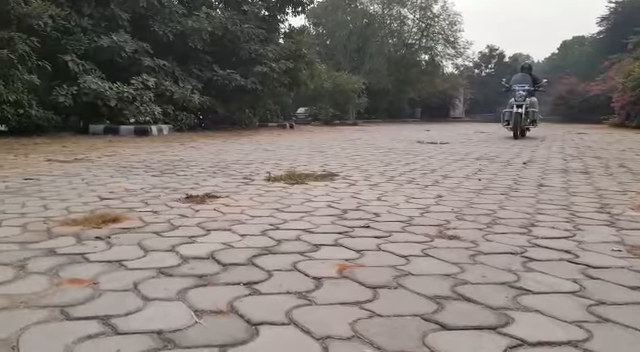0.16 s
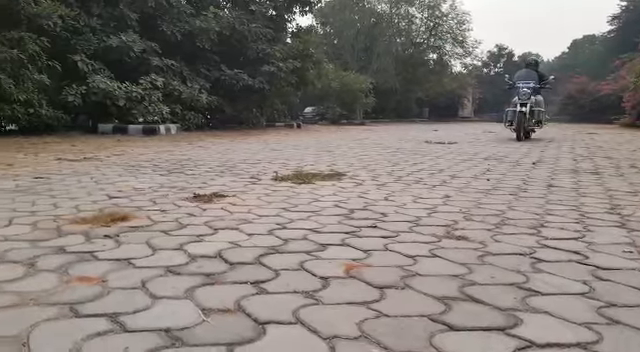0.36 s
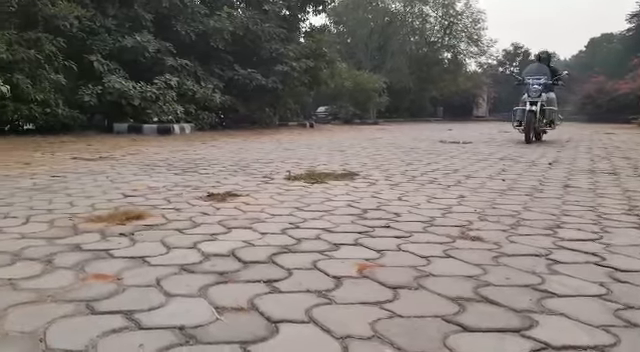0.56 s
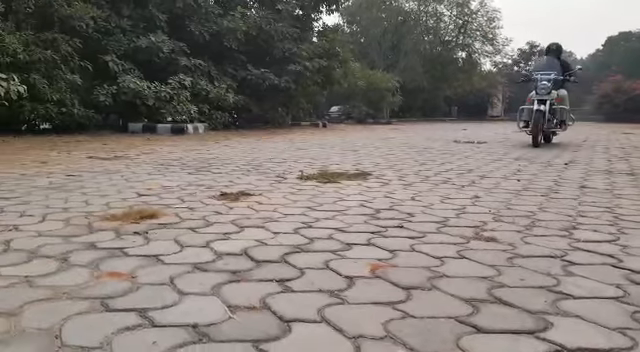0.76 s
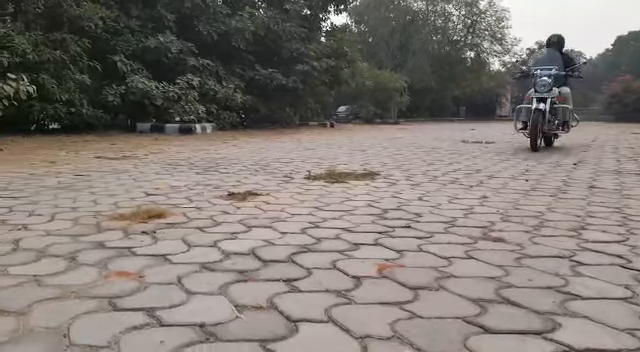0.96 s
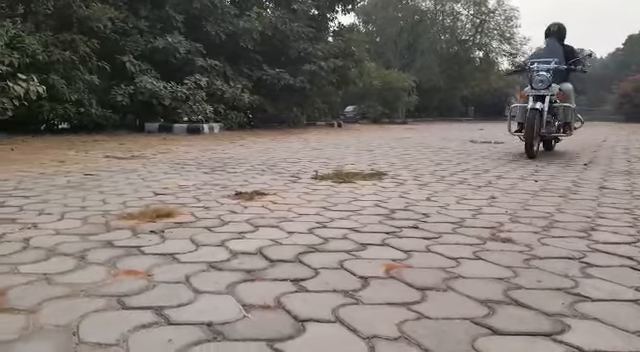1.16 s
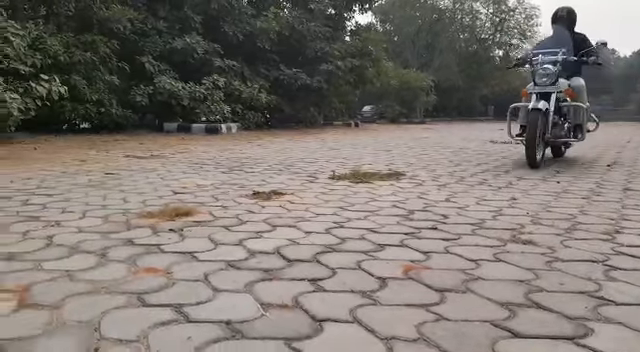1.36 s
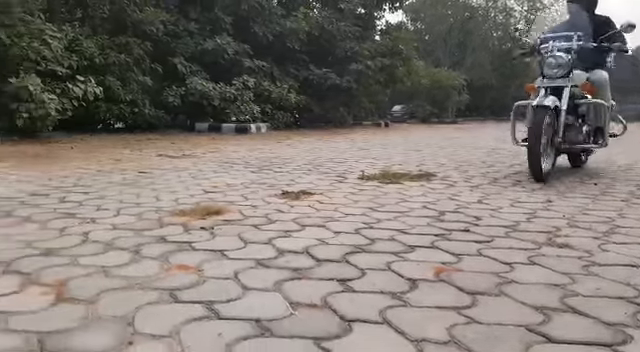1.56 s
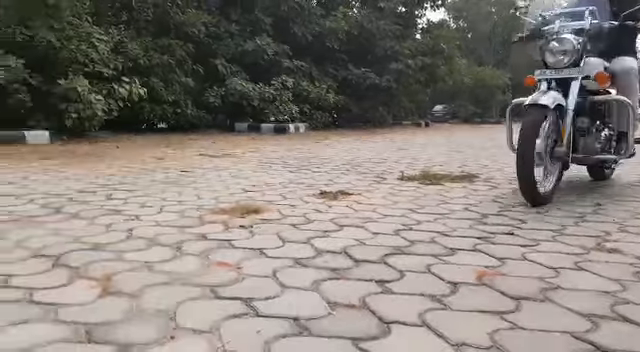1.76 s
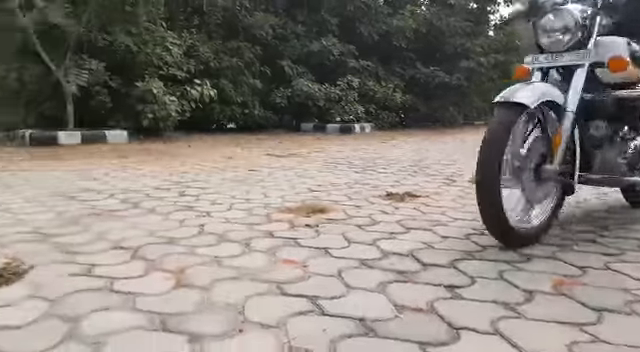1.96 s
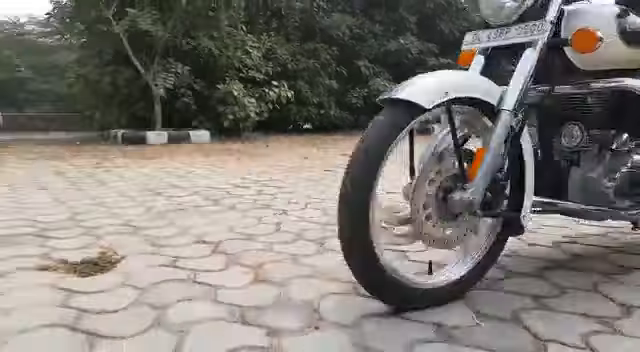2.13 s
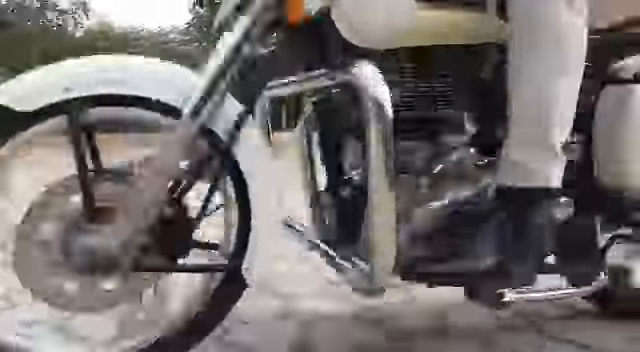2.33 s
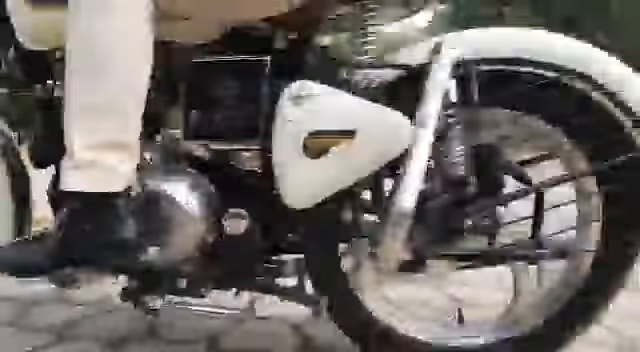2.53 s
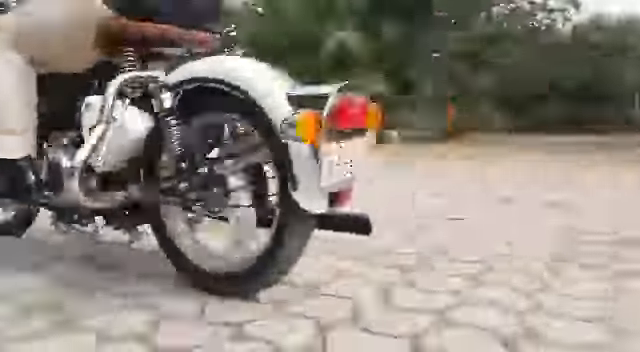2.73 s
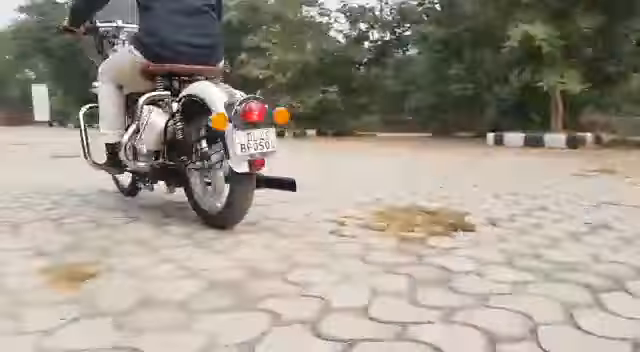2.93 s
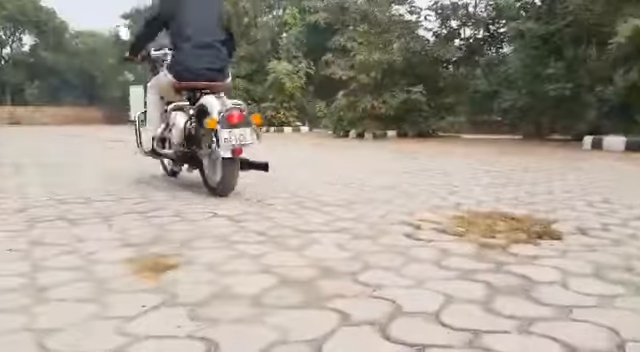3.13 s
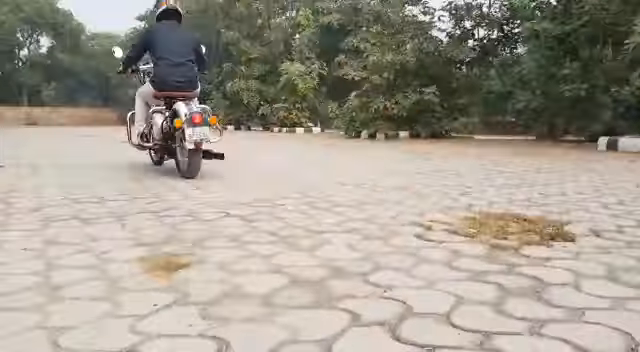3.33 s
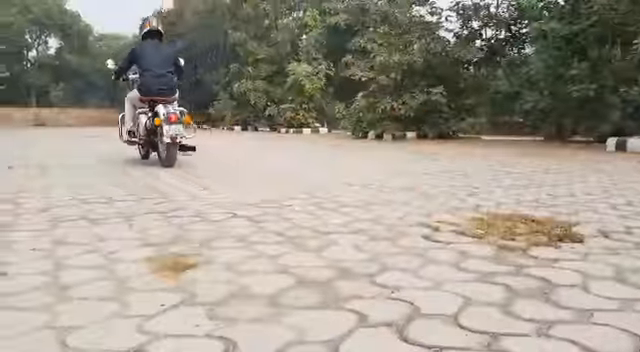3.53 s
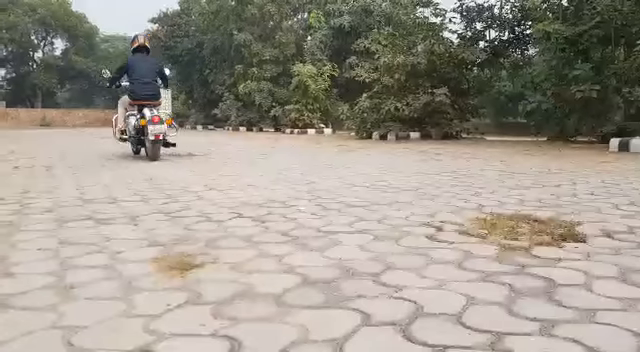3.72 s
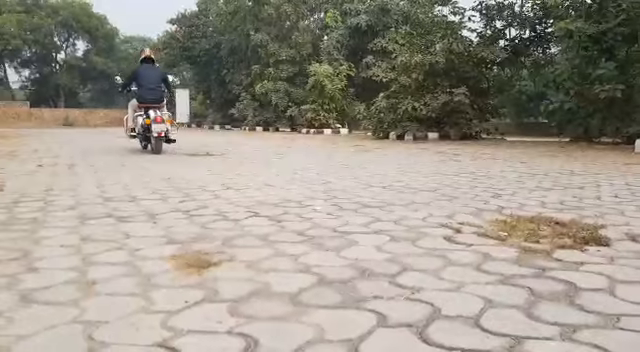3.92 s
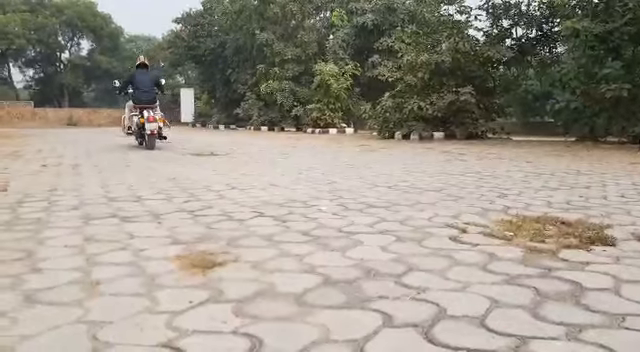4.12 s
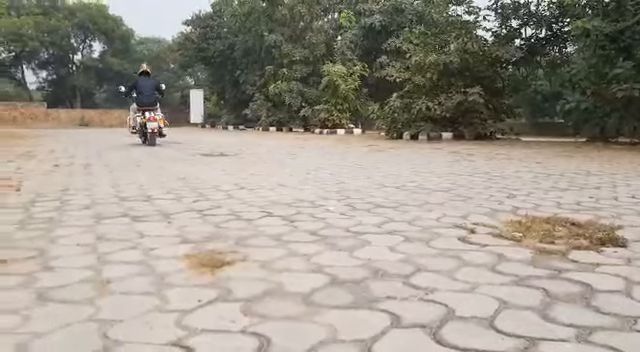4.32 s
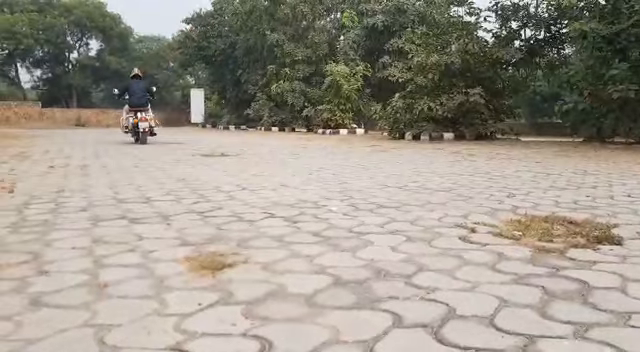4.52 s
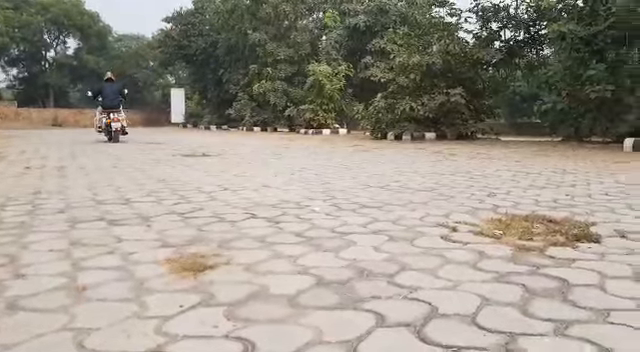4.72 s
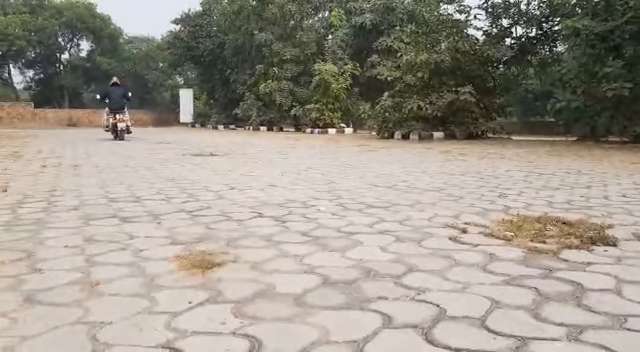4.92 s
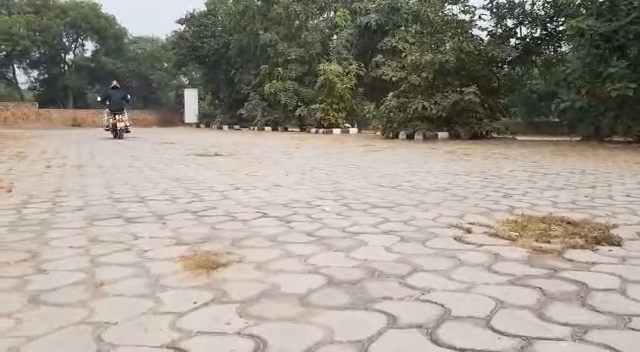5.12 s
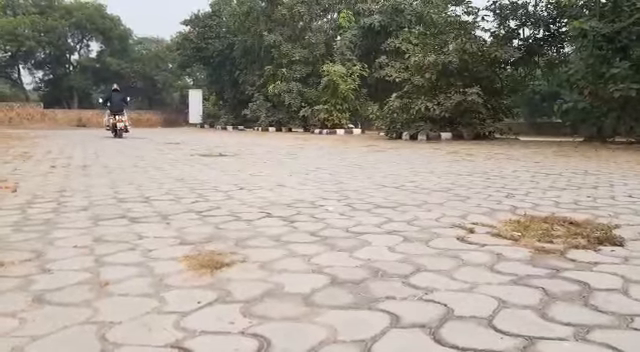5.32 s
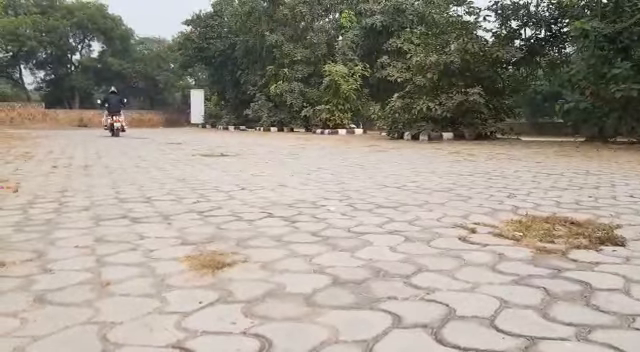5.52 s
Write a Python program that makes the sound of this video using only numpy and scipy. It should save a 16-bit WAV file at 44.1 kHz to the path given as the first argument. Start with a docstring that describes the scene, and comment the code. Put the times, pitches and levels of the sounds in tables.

```python
"""A single-cylinder motorcycle with an open pipe rolls past a pair of microphone ports on a paved lot among trees.
Every firing knocks a few low pipe modes, and gas puffs rasp at the pipe's mouth once it is heard from behind.
Valves, chain and tyres are banded noise that ticks with the engine cycle; a casing sings near 1 kHz on the approach.
The trees return the beat as a decaying noise echo. Faint bands and gritty hisses come and go over outdoor air,
and a low resonant rumble swells at the end."""
import sys
import numpy as np
from scipy import signal
from scipy.io import wavfile
from scipy.ndimage import uniform_filter1d, map_coordinates

SR = 44100
rng = np.random.default_rng(int(sys.argv[2]) if len(sys.argv) > 2 else 0)


def pcm_store(signal):
    """Save signal as 16-bit PCM."""
    levels = np.round(np.clip(np.atleast_2d(signal), -1, 1) * 32767)
    wavfile.write(sys.argv[1], SR, levels.astype(np.int16).T)


N = 250488
T = np.arange(N) / SR

# the ride past: time_s [s], beat_db [dB, before each pipe mode's own level], echo_db [dB relative to the beat]
RIDE = [(0, -11, -16), (.2, -10.5, -12), (.55, -9, -10.5), (1.2, -6.5, -13.5), (1.7, -3, -13.5),
        (2.1, -0.8, -12.5), (2.6, -1.4, -12), (2.85, -2.5, -32), (3.1, -5.5, -28), (3.8, -12, -45),
        (4.1, -11.9, -22), (4.8, -10, -16), (5, -8, -15), (5.12, -10.5, -9.5), (5.68, -12.5, -11)]


def exhaust(spread_db=0.71):
    """Each firing rings damped pipe modes, softened by the opening valve; the two lowest boom at close range."""
    # pipe modes: pitch_hz [Hz], t60_s [s], polarity [+1/-1], front_db and rear_db [dB over the beat level]
    pipe_modes = [(71, .28, 1, -8, -7.4), (135, 1.0, -1, 1.4, -.7), (216, .043, -1, 18.6, 20),
                  (299, .17, -1, 4.4, 3.5), (347, .043, 1, 17.3, 19.8), (390, .04, 1, 17.4, 17.5)]
    rise_s, valve_hz = .0034, 114   # from valve opening to the dip; softness of the blow
    outflow_s, shut_t60_s = .0174, .078   # the gas stream feeds the ring this long, then it dies fast
    jitter_s, beat_spread_db, pitch_spread = .0002, .5, .01   # chance from firing to firing
    boom_front_db, boom_rear_db, boom_near_db, pipe_pass_s = 1.5, 0.3, 4.5, 2.63

    count = turns()
    fire_s = np.interp(np.arange(count[-1] // 1 + 1), count, T)
    fire_s = np.r_[2 * fire_s[0] - fire_s[1], fire_s]   # the beat already ringing at the start
    mode_chance = rng.standard_normal((len(fire_s), len(pipe_modes)))
    pitch_chance, level_chance, time_chance = rng.standard_normal((3, len(fire_s)))
    fire_s = fire_s + jitter_s * time_chance
    level_db = in_time(RIDE, fire_s)[0] + beat_spread_db * level_chance
    rear = np.interp(fire_s, T, facing())
    near = np.interp(fire_s, T, nearness(pipe_pass_s))
    boom_db = boom_front_db + rear * (boom_rear_db - boom_front_db) + boom_near_db * near ** 2

    u = np.arange(SR // 5) / SR
    out = np.zeros(N + 2 * SR)   # a second of room at each end
    shut_db = -60 * np.maximum(u - outflow_s, 0) / shut_t60_s
    for i in range(len(fire_s)):
        start = SR + round((fire_s[i] - rise_s) * SR)
        heat = 1 + pitch_spread * pitch_chance[i]   # the gas is a little hotter or cooler at each firing
        for k, (hz, t60, polarity, front_db, rear_db) in enumerate(pipe_modes):
            mode_db = level_db[i] + front_db + rear[i] * (rear_db - front_db)
            mode_db += (k < 2) * boom_db[i] + spread_db * mode_chance[i, k]
            envelope = amp(mode_db - 60 * u / t60 + shut_db)
            out[start:start + len(u)] += polarity * envelope * np.sin(2 * np.pi * hz * heat * u)
    r = np.exp(-2 * np.pi * valve_hz / SR)
    return signal.lfilter([(1 - r) ** 3], np.poly([r, r, r]), out)[SR:SR + N]   # three one-pole low-passes


def puffs():
    """Raspy noise bursts in step with the beat, once the pipe's mouth points this way."""
    # gas puffs: at [share of cycle], decay [share of cycle], level_db [dB relative to the beat level]
    puff_times = [(0.229, 0.25, -33), (.945, 0.024, -28)]
    puff_hz, width_hz = 915, 300
    turn = cycle()
    gate = sum(amp(db) * np.exp(-((turn - at) % 1) / decay) for at, decay, db in puff_times)
    rasp = resonance(resonance(rng.standard_normal(N), puff_hz, width_hz), puff_hz, 2 * width_hz)
    return amp(in_time(RIDE)[0]) * facing() * gate * rms_one(rasp)


def running_gear(flicker_db=0.87, miss_db=0.4, scatter_hz=900):
    """Banded noise, ticking with valve contacts and loose parts; returns the direct and the scattered stereo part."""
    # noise colour from the front: band_hz [Hz], level_db [dB per Hz]
    front_colour = [(250, -30), (430, 3), (833, -7.5), (998, -2), (1210, -20.5), (1430, -8.5), (1770, -15),
                    (4360, -22.5), (5630, -22), (15600, -24.5)]
    # noise colour from behind: band_hz [Hz], level_db [dB per Hz]
    rear_colour = [(250, -33), (430, -4), (599, 1.5), (675, -9.5), (954, -2.5), (1410, -20), (3810, -29),
                   (7380, -28), (15600, -18)]
    # colour added broadside: band_hz [Hz], lift_db [dB]
    side_lift = [(430, -6), (520, -4), (700, 6.5), (1000, 2), (2500, 1), (4500, 0), (9000, -8),
                 (15600, -5.5)]
    # valve train contacts: at [share of cycle], decay [share of cycle], lift_db [dB, before view and range scale it]
    contacts = [(0.197, 0.13, 3.5), (0.482, 0.014, -2), (.72, 0.051, -1), (0.952, 0.11, 1.5)]
    # resonances of fins and covers: pitch_hz [Hz], width_hz [Hz], front_db and rear_db [dB over the gear noise]
    fins = [(533.5, 27, 1, -5), (596, 33, -55, 2), (894, 21, 0, -15), (1415, 66, 0.5, -15),
            (1509, 22, 4.5, -40), (1620, 17, -3, -3), (2034, 17, 8, -51), (2440, 38, 3.5, -13),
            (3120, 21, -10, 9), (4270, 640, -8, -5), (7510, 690, -3, 7)]
    growl_front_db, growl_rear_db, growl_near_db, growl_pass_s = -32, -36, 3.5, 2.42   # relative to the beat level
    rattle_per_s, rattle_s, rattle_db = 130, 0.0019, 2   # knocks a second, decay, strength over the hiss
    scatter_db = 1   # diffuse share of the gear noise

    rear, near, turn = facing(), nearness(PASS_S), cycle()
    growl_db = in_time(RIDE)[0] + growl_front_db + rear * (growl_rear_db - growl_front_db)
    growl_db = growl_db + growl_near_db * nearness(growl_pass_s) ** 4.5
    hiss_db = passing_db(PASS_S, near_db=-33.5, rear_db=-6, far_db=-55.5)
    sizzle_db = passing_db(2.4, near_db=-39, rear_db=-3, far_db=-64)

    ticks_db = sum((db + miss_db * drift(8.6)) * np.exp(-((turn - at) % 1) / decay) for at, decay, db in contacts)
    ticks_db = ticks_db * (1 - 0.2 * rear + 0.42 * near)   # sharp close by, blurred from behind
    knocks = (rng.random(N) < rattle_per_s / SR) * rng.uniform(0.17, 1.36, N)
    knocks = knocks * amp(.5 * (hiss_db - hiss_db.max()))   # heard mostly at close range
    rattle = 1 + amp(rattle_db) * signal.lfilter([1], [1, -np.exp(-1 / (rattle_s * SR))], knocks)

    # two noise sets for alternate bands, each with a direct, a left and a right channel
    white = rng.standard_normal((2, 3, N)) * rattle * amp(ticks_db)
    edges_hz = 400 * 2 ** np.arange(0, 5.6, .4)
    parts = [0, 0, 0]   # growl under 1.6 kHz, hiss to 6.5 kHz, sizzle above
    for k, (low, high) in enumerate(zip(edges_hz, edges_hz[1:])):
        hz = np.sqrt(low * high)
        colour_db = (1 - rear) * at_hz(front_colour, hz) + rear * at_hz(rear_colour, hz)
        colour_db = colour_db + near * at_hz(side_lift, hz)
        parts[int(hz > 1600) + int(hz > 6500)] += band(white[k % 2], low, high) * amp(colour_db + flicker_db * drift(37.0))

    gear = 0
    for level_db, part in zip((growl_db, hiss_db, sizzle_db), parts):
        power = uniform_filter1d(np.mean(part ** 2, axis=0), size=SR // 4)
        gear = gear + amp(level_db) * part / np.sqrt(power)
    ringing = 0
    for hz, width_hz, front_db, rear_db in fins:
        ringing = ringing + amp(front_db + rear * (rear_db - front_db)) * resonance(gear, hz, width_hz)
    gear = gear + ringing
    scattered = high_pass(gear[1:], scatter_hz, order=1)
    return gear[0], amp(scatter_db) * scattered


def whine(idle=0.33):
    """A narrow casing resonance on noise, shaken by a valve contact once a cycle."""
    # singing casing: time_s [s], level_db [dB]
    whine_level = [(0, -42.5), (.8, -40), (1.2, -36), (1.93, -35), (2.2, -63), (2.3, -28.5), (2.55, -43),
                   (3.05, -62), (5.68, -56)]
    whine_hz, width_hz = 985.5, 22.6
    shake_at, shake_fade = 0.15, 0.23   # shares of the cycle
    shake = idle + np.exp(-((cycle() - shake_at) % 1) / shake_fade)
    tone = resonance(resonance(shake * rng.standard_normal(N), whine_hz, width_hz), whine_hz, 7.5 * width_hz)
    return amp(in_time(whine_level)[0]) * tone / np.sqrt(uniform_filter1d(tone ** 2, size=SR // 5) + 1e-12)


def trees(x):
    """Scattered returns from foliage and kerbs: decaying noise as the echo, nearly alike at both ports."""
    t60_s, gap_s, low_cut_hz = 0.65, 0.0233, 182
    u = np.arange(SR // 2) / SR
    noise = rng.standard_normal((2, len(u))) * amp(-60 * u / t60_s) * (u > gap_s)
    tail = np.array([noise[0] + 0.32 * noise[1], noise[0] - 0.32 * noise[1]])
    tail = tail / np.sqrt(np.sum(noise[0] ** 2))
    return signal.fftconvolve(high_pass(x, low_cut_hz)[None], tail, axes=1)[:, :N]


def tones():
    """Faint narrow bands: noise twice through a resonance, swelling and fading."""
    # faint bands: start_s [s], length_s [s], pitch_hz [Hz], width_hz [Hz], level_db [dB]
    faint_bands = [(0, 0.83, 1525, 50, -47), (0.043, .5, 1660, 25, -52), (1.5, .8, 4130, 710, -47.5),
                   (3.751, 0.76, 3120, 120, -62)]
    out = np.zeros(N)
    for start_s, length_s, hz, width_hz, db in faint_bands:
        start, n = round(start_s * SR), round(length_s * SR)
        tone = resonance(resonance(rng.standard_normal(SR), hz, width_hz), hz, 2 * width_hz)
        out[start:start + n] += amp(db) * rms_one(tone)[-n:] * signal.windows.tukey(n, .5)
    return out


def scuffs(broad_db=-4):
    """Brief gritty hisses: a broad noise hump over wide-band noise."""
    # gritty hisses: start_s [s], length_s [s], hump_db [dB], centre_hz [Hz]
    hisses = [(3.356, 0.045, -50, 4100), (3.525, 0.061, -41, 4300), (3.553, .006, -32.5, 3000),
              (4.433, 0.12, -50, 3600), (4.532, 0.015, -52.5, 9000), (5.587, 0.0097, -52.5, 9000),
              (5.647, 0.014, -51, 11000)]
    out = np.zeros((2, N))
    for start_s, length_s, db, hz in hisses:
        start, n = round(start_s * SR), round(length_s * SR)
        white = rng.standard_normal((2, SR // 8))
        hump = rms_one(band(white, hz * 0.57, hz * 1.35))
        grit = hump + amp(broad_db) * rms_one(band(white, 1500, 17500))
        out[:, start:start + n] += amp(db) * grit[:, -n:] * signal.windows.tukey(n, .6)
    return out


def rumble():
    """A wavering low hum: noise through two sharp resonances, with swells over a resting level."""
    # swells of a far low rumble: centre_s [s], half_width_s [s], level_db [dB]
    swells = [(4.9, 0.055, -41), (5.3, 0.13, -31.5), (5.58, .2, -35)]
    rumble_hz, rest_db = 47.5, -45
    hum = resonance(resonance(rng.standard_normal(N), rumble_hz, 2.4), rumble_hz, 5.0)
    level = amp(rest_db) + sum(amp(db) * np.exp(-((T - s) / width_s) ** 2) for s, width_s, db in swells)
    return level * hum / np.sqrt(uniform_filter1d(hum ** 2, size=SR // 12) + 1e-12)


def air(alike_hz=700):
    """Outdoor floor of gently drifting noise bands, alike at both ports only in the bass."""
    # air colour, as a shape: band_hz [Hz], level_db [dB per Hz]
    air_colour = [(18, -42), (30, -10), (103, 7.5), (169, -3), (225, 2), (390, -6), (469, -10), (593, -35),
                  (1560, -21), (15600, -42.5)]
    out, white = 0, rng.standard_normal((2, 2, N))   # alternate bands use separate noise
    edges_hz = 25 * 2 ** np.arange(0, 9.6, .5)
    for k, (low, high) in enumerate(zip(edges_hz, edges_hz[1:])):
        mid, side = band(white[k % 2], low, high)
        hz = np.sqrt(low * high)
        alike = 1 / (1 + (hz / alike_hz) ** 2)
        stereo = np.sqrt(1 + alike) * mid + np.sqrt(1 - alike) * side * [[1], [-1]]
        out = out + amp(at_hz(air_colour, hz) + 1.3 * drift(11.0)) * stereo
    return amp(-38.5) * rms_one(out)


PASS_S = 2.44   # the engine's closest point


def turns():
    """Engine cycles counted from the first exhaust dip, the running sum of the firing rate."""
    # engine speed as heard, sagging just after the pass: time_s [s], firing_rate [firings per s]
    engine_speed = [(0, 12.52), (.25, 13.111), (1, 13.689), (1.7, 14.413), (2, 14.589), (2.4, 15.013),
                    (3, 14.818), (3.3, 15.076), (4.2, 15.419), (4.5, 15.444), (5, 15.772), (5.68, 15.861)]
    first_dip_s = .0519
    count = np.cumsum(in_time(engine_speed)[0]) / SR
    return count - np.interp(first_dip_s, T, count)


def cycle():
    """Share 0-1 of the engine cycle, 0 at each exhaust dip."""
    return turns() % 1


def nearness(pass_s):
    """Gain 1 / distance to the closest noisy part, 1 while it is broadside."""
    miss_m, speed_m_per_s = 0.78, 5.42
    length_m = 1.13   # the noisy parts are spread along the machine
    along_m = np.maximum(speed_m_per_s * np.abs(T - pass_s) - length_m / 2, 0)
    return miss_m / np.hypot(miss_m, along_m)


def facing():
    """The front view gives way to the rear view: 0 heard from the front, near 1 from behind."""
    return blend(0, 0.98, at_s=2.82, width_s=0.48)


def passing_db(pass_s, near_db, rear_db, far_db):
    """Level of a noise that falls with distance, is shaded from behind and returns scattered by the lot."""
    far_follows = 0.41   # share of the echo's swing in the scattered hiss
    direct = nearness(pass_s) * amp(near_db + facing() * rear_db)
    return 20 * np.log10(np.hypot(direct, amp(far_db + far_follows * in_time(RIDE)[1])))


def ports(x):
    """The far port hears the source later and with shaded treble as it crosses from right to left."""
    lag = blend(8.5, -4.5, at_s=2.49, width_s=0.072)   # left port's lag in samples
    treble = high_pass(x, 6000, order=1)
    shade = 0.1 * lag * treble + 0.0013 * lag * x
    left, right = x - shade, x + shade
    n = np.arange(N)
    return np.array([map_coordinates(left, [n - lag / 2], order=3, mode="nearest"),
                     map_coordinates(right, [n + lag / 2], order=3, mode="nearest")])


def amp(db):
    """Decibels to gain."""
    return 10 ** (np.asarray(db) / 20)


def rms_one(x):
    """Scale to rms 1."""
    return x / np.sqrt(np.mean(x ** 2) + 1e-20)


def in_time(rows, at=T):
    """Columns of a curve table read at the given times."""
    s, *columns = np.transpose(rows)
    return [np.interp(at, s, c) for c in columns]


def at_hz(points, hz):
    """A spectrum read on a log frequency axis."""
    point_hz, level_db = np.transpose(points)
    return np.interp(np.log(hz), np.log(point_hz), level_db)


def blend(before, after, at_s, width_s):
    """A smooth step in time."""
    return before + (after - before) * (1 + np.tanh((T - at_s) / width_s)) / 2


def drift(rate_hz):
    """Slow random wander of rms 1: low-passed noise made at every 40th sample."""
    r = np.exp(-80 * np.pi * rate_hz / SR)
    slow = signal.lfilter([1], [1, -2 * r, r * r], rng.standard_normal(N // 40 + 2002))[2000:]
    return np.interp(np.arange(N) / 40, np.arange(len(slow)), rms_one(slow))


def band(x, low_hz, high_hz, order=2):
    """Butterworth band-pass."""
    edges_hz = [low_hz, min(high_hz, SR / 2.2)]
    return signal.sosfilt(signal.butter(order, edges_hz, "band", fs=SR, output="sos"), x)


def high_pass(x, hz, order=2):
    """Butterworth high-pass."""
    return signal.sosfilt(signal.butter(order, hz, "high", fs=SR, output="sos"), x)


def resonance(x, hz, width_hz):
    """Two-pole resonance with a gain of about 1 at its peak."""
    r = np.exp(-np.pi * width_hz / SR)
    feedback = [1, -2 * r * np.cos(2 * np.pi * hz / SR), r * r]
    return signal.lfilter(np.array([1, 0, -1]) * (1 - r * r) / 2, feedback, x)


def scene():
    """The machine through the ports, plus echo and surroundings."""
    beats = exhaust()
    gear, scattered = running_gear()
    echo = trees(beats * amp(in_time(RIDE)[1]))
    machine = ports(beats + gear + whine() + puffs() + tones())
    return machine + scattered + echo + air() + rumble() + scuffs()


def record(dry):
    """The left port is a little hotter; the deep bass rolls off, peaks are rounded under full scale, the top is cut."""
    left_db = 0.9   # left over right
    knee = .85   # above this the input stage rounds the peaks
    hot = high_pass(dry, 41) * amp([[left_db / 2], [-left_db / 2]])
    over = np.maximum(np.abs(hot) - knee, 0)
    rounded = hot - np.sign(hot) * (over - (1 - knee) * np.tanh(over / (1 - knee)))
    return signal.sosfilt(signal.ellip(12, .5, 70, 15750, fs=SR, output="sos"), rounded)


dry = scene()
out = record(dry)
pcm_store(out)
```